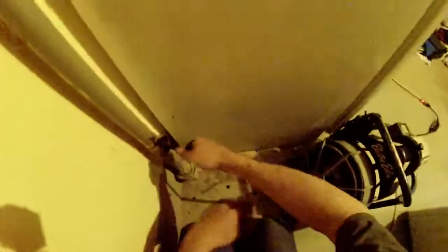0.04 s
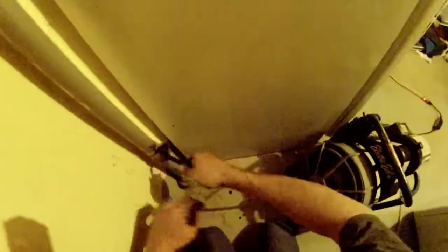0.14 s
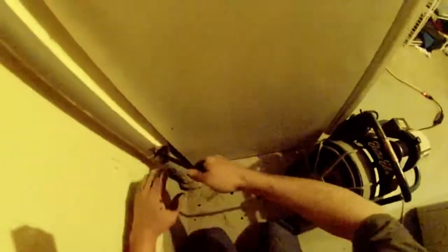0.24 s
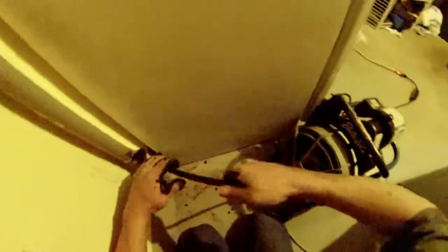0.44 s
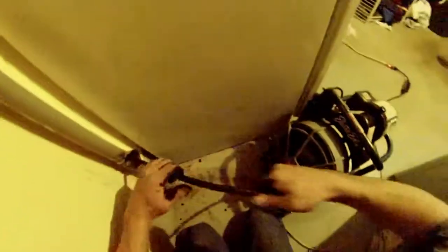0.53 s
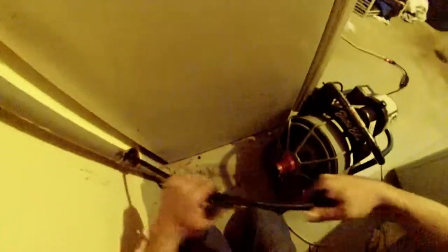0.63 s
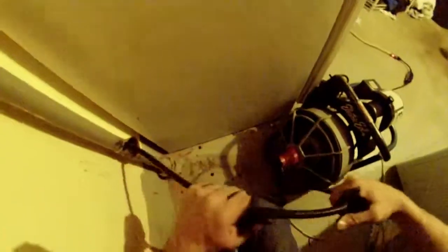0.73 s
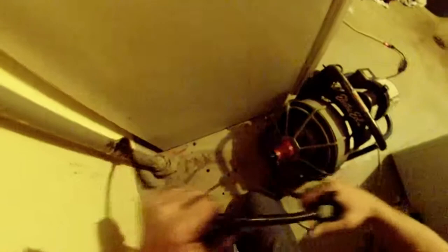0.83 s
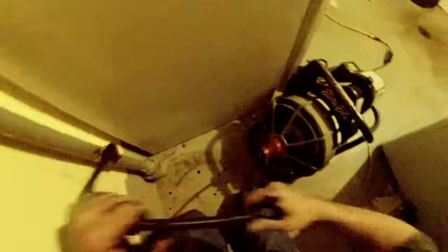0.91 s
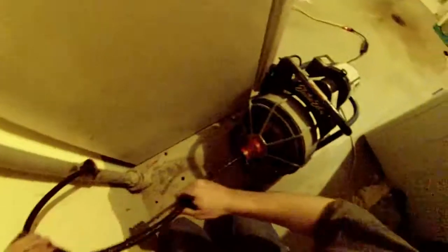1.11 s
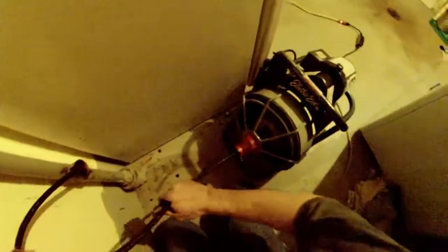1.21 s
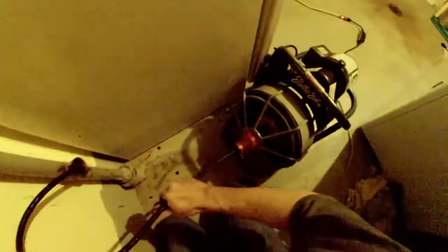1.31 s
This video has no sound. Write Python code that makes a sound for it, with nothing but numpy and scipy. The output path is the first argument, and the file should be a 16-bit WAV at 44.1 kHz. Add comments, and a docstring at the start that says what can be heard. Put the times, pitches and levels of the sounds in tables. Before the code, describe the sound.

One rattling scrape of a steel drain cable pulled from a pipe, then faint handling.

```python
"""A coiled steel drain cable, drawn out of a pipe in one stroke of the arm. Basement, close up, mono.
Its coils rattle over the rim, faster and then slower: a bright rasp over a low buzz, and the metal
rings on. The cable slides softly before the pull, rustles as it hangs slack, and scuffs as the hand
takes a new grip. Behind it are quick reflections from the corner, a short room tail and a low rumble."""
import sys
import numpy as np
from scipy import signal
from scipy.io import wavfile

SR = 44100
rng = np.random.default_rng(int(sys.argv[2]) if len(sys.argv) > 2 else 0)


def wrap_up_sound(samples):
    """Save the sound to the file named by the first command line argument, as 16-bit audio."""
    columns = np.atleast_2d(samples).T
    # keep every value between -1 and 1, then stretch to whole-number steps
    tamed = np.clip(columns, -1, 1)
    steps = np.round(tamed * 32767).astype(np.int16)
    wavfile.write(sys.argv[1], SR, steps)


N = 59535
T = np.arange(N) / SR

# coils passing over the rim: t/s, rate/Hz
COIL_RATE = [(.19, 114), (.24, 140), (.30, 181), (.345, 197), (.38, 210), (.405, 211), (.425, 221),
             (.46, 218), (.48, 221), (.505, 229), (.555, 226), (.58, 228), (.60, 219), (.625, 214),
             (.66, 221), (.685, 214), (.71, 195), (.76, 136), (.86, 80)]
# strength of the scraping and of the buzz: t/s, level/dB
SCRAPE_LEVEL = [(.192, -51.5), (.218, -36.5), (.265, -34.5), (.305, -28), (.35, -29.5), (.43, -29.3),
                (.47, -32.5), (.53, -30), (.62, -32.3), (.685, -30.3), (.735, -34.3), (.785, -35),
                (.82, -45.5), (.865, -80)]
BUZZ_LEVEL = [(.2, -51), (.255, -49), (.32, -52), (.39, -62), (.45, -44.5), (.51, -58.5), (.59, -44),
              (.70, -62.5), (.80, -43.5), (.86, -81.5)]
# spectra of the rasp, the buzz and the uneven chatter of the coils: f/Hz, relative level/dB
RASP_COLOUR = [(60, -40), (130, -6.5), (280, -20.5), (400, -2), (520, -2), (600, -6), (850, 1.5), (1030, 2),
               (1400, -4), (1800, 0.5), (2300, 0), (3200, 7.5), (4000, 4), (4900, 7), (5900, -1.5),
               (6700, 4), (7550, -1), (8400, -1), (9250, 2.5), (10700, -1.5), (12400, -0.5), (13300, -2.5),
               (15500, -7.5)]
BUZZ_COLOUR = [(60, -39), (110, -24), (145, 11.5), (220, 8.5), (290, -3.5), (390, -3), (480, -15.5),
               (660, -1), (900, -10), (1150, -14), (1500, 9), (2200, -34), (5000, -38.5)]
CHATTER_COLOUR = [(150, -30), (300, -13), (400, -2), (460, 0), (560, -12), (1000, -35)]
# damped resonances of the pipe, bright ones of the coils: f/Hz, width/Hz, relative level/dB
PIPE_MODES = [(375, 30, -14), (515, 25, -14), (657, 16, -8), (772, 17, -6), (921, 30, -13), (1130, 25, -11),
              (1205, 22, -3), (1380, 35, -1), (1450, 25, -3), (1570, 35, -3), (1982, 20, -1),
              (2400, 16, -1), (2522, 22, 0), (2690, 30, -3), (2965, 22, 0), (3070, 28, -3), (3460, 30, -1),
              (3970, 30, -2), (4263, 16, -1), (4421, 20, -3), (4528, 40, 0)]
COIL_MODES = [(4835, 50, 4), (4985, 30, 2), (5610, 45, 1), (6340, 50, -3), (6533, 25, 2), (6716, 35, -1),
              (6893, 25, -1), (7910, 40, -3), (8745, 35, 5), (8930, 30, 3), (9290, 50, -1), (9540, 45, 0),
              (9740, 45, 0), (10360, 30, 2), (11100, 45, -3), (11500, 40, -2), (11710, 35, 0),
              (11905, 55, 0), (12390, 55, -1), (12597, 35, -1)]
# flare-ups as the cable bears on the rim and feeds one resonance: t/s, half length/s, f/Hz, boost/dB
FLARES = [(.285, .02, 1415, 7), (.31, .015, 515, 9), (.32, .02, 921, 8), (.325, .025, 772, 6),
          (.345, .025, 1415, 4), (.35, .06, 1205, 4), (.405, .03, 2522, 7), (.425, .025, 1570, 4),
          (.465, .025, 1982, 3), (.515, .025, 1380, 5), (.55, .035, 1130, 7), (.555, .018, 1570, 7),
          (.565, .02, 2965, 4), (.625, .018, 1450, 6), (.65, .035, 2400, 6), (.68, .02, 1570, 6),
          (.715, .02, 1205, 6), (.745, .035, 772, 8)]
# long ringing of the metal: f/Hz, relative level/dB, t60/s
RING_MODES = [(1204, -4, .2), (1389, -6, 1.1), (1427, -7, .8), (1545, -11, 1.0), (1620, -10, .73),
              (1857, -5, .62), (2135, 2.5, .6), (3950, -5, .48), (4500, -1, .45), (4597, -9, .62),
              (4807, -7, .48), (5044, -8, .5), (5443, -6, .45), (5884, -3, .4), (6212, -9, .42),
              (6535, -5, .25), (6713, -4, .33), (6895, -5, .25)]

# soft sliding and light ticks on the rim as the pull begins: t/s, level/dB
SLIDE_LEVEL = [(.055, -81), (.066, -61.5), (.12, -66.5), (.13, -54.5), (.19, -54.5), (.3, -82)]
RIM_TICKS = [(.104, -51), (.128, -53), (.202, -41), (.215, -38)]
# resonances that a light touch wakes: f/Hz, width/Hz, relative level/dB
TOUCH_MODES = [(1390, 14, -2), (2400, 46, -2), (4550, 40, 0), (6520, 35, -1), (7760, 79, -7),
               (8950, 37, -2), (9720, 100, -6)]
# rustle and ticks of the slack cable in the hand: t/s, level/dB
RUSTLE_LEVEL = [(.86, -73), (.95, -67), (.96, -55), (.985, -60.5), (1.03, -69.5), (1.10, -70.5),
                (1.18, -86.5), (1.26, -69.5), (1.31, -70), (1.35, -58)]
HAND_TICKS = [(.957, -58), (1.005, -59), (1.094, -65), (1.234, -66), (1.267, -64)]
# low rubbing in pipe and hands, dull knocks of the new grip: t/s, level/dB
RUB_LEVEL = [(.05, -81), (.09, -62), (.17, -56), (.24, -57), (.315, -51), (.42, -59), (.64, -63),
             (.73, -46), (.80, -51), (.87, -59), (.94, -70), (1.05, -85)]
GRIP_KNOCKS = [(1.289, -55), (1.297, -55), (1.308, -57), (1.317, -59), (1.325, -53), (1.333, -55),
               (1.342, -46)]
# spectra of the sliding, the rustle, the rubbing and the grip: f/Hz, relative level/dB
SLIDE_COLOUR = [(100, -16), (400, -7), (900, -1.5), (1400, 7.5), (2200, -5), (3200, 0.5), (4500, -3.5),
                (5700, -9), (7000, -2.5), (9500, -5.5), (12000, -4.5), (15500, -19)]
RUSTLE_COLOUR = [(100, -18), (400, -2), (1400, -2), (2200, -5), (3200, -1.5), (4500, 0), (7000, -1.5),
                 (9500, -2), (12000, -1), (15500, -13)]
RUB_COLOUR = [(40, -35), (100, -12), (165, 5.5), (210, 2.5), (280, -5), (380, 1.5), (470, -7), (620, -8),
              (780, -6), (1000, -17), (2000, -11), (6000, -33)]
GRIP_COLOUR = [(100, -11), (400, -16), (580, 5), (850, 2.5), (1300, -15), (3000, -16.5), (6000, -19),
               (15000, -33)]
# soft low swell as the arm stops: t/s, half length/s, f/Hz, level/dB
ARM_THUD = (.91, .05, 62, -62)

# decay of the basement: f/Hz, t60/s
BASEMENT_DECAY = [(100, 0.65), (400, 0.11), (1000, 0.32), (3000, 0.27), (6000, 0.27), (14000, 0.095)]
# spectrum of its room tone: f/Hz, relative level/dB
ROOM_TONE_COLOUR = [(20, -11), (45, 0), (62, 5.5), (90, -3), (200, -6.5), (300, -16), (700, -21.5),
                    (1500, -22), (4000, -30), (10000, -49.5), (15500, -46.5)]

JITTER_S, CRUNCH_S, TICK_S, KNOCK_S = .00003, .00055, .004, .008
ALIKE_HZ = 2800  # below this every coil sounds much alike
RASP_DB, PIPE_DB, COILS_DB, CHATTER_DB, RING_DB = -10, -7.5, -9.5, -31, -17.5
CORNER_DB, TAIL_DB, ROOM_TONE_DB = 6.5, -10, -72.5


def cable_pull(roughness=.4, grit_db=-4.5):
    """Close on the rim: each coil gives a firm blow low down and a crunch above, exciting the metal."""
    hits = coil_hits()
    scrape_db = curve(SCRAPE_LEVEL, left=-140, right=-140)
    crunch = through(hits, np.exp(-T[:2000] / CRUNCH_S)) * rng.standard_normal(N)
    friction = crunch / crunch.std() + amp(grit_db) * grit()
    blows = np.sqrt(1 - roughness ** 2) * hits + roughness * friction
    low, high = (signal.butter(1, ALIKE_HZ, kind, fs=SR) for kind in ("low", "high"))
    scrape = (signal.lfilter(*low, blows) + signal.lfilter(*high, friction)) * amp(scrape_db)
    rasp = amp(RASP_DB) * through(scrape, colour(RASP_COLOUR))
    pipe = amp(PIPE_DB) * resonances(scrape, PIPE_MODES)
    coils = amp(COILS_DB) * resonances(scrape, COIL_MODES)
    buzz = through(hits * amp(curve(BUZZ_LEVEL, left=-140)), colour(BUZZ_COLOUR))
    uneven_hits = hits * rng.standard_normal(N)
    chatter = through(uneven_hits * amp(scrape_db + CHATTER_DB), colour(CHATTER_COLOUR))
    return rasp + amp(CORNER_DB) * corner_reflections(rasp) + pipe + coils + buzz + chatter


def coil_hits():
    """One blow as each coil drops over the rim, a little uneven in time."""
    passed = np.cumsum(curve(COIL_RATE)) / SR
    count = int(passed[-1])
    jitter = JITTER_S * rng.standard_normal((400, 2))[:count, 0]
    times = np.interp(np.arange(count) + 1, passed, T) + jitter
    hits = np.zeros(N)
    hits[np.clip((times * SR).astype(int), 0, N - 1)] = 1
    return hits / hits.std()


def resonances(scrape, table, swell_db=3, swell_s=.09, reach_hz=45):
    """As the contact shifts, each resonance is fed by turns more and less; some flare up briefly."""
    out = np.zeros(N)
    for (hz, _, _), mode in zip(table, modes(table)):
        swell = through(rng.standard_normal(N), unit(np.hanning(int(swell_s * SR))))
        flare_db = sum(db * bell(at, half) for at, half, flare_hz, db in FLARES
                       if abs(flare_hz - hz) < reach_hz)
        out += through(scrape * amp(swell_db * np.tanh(swell) + flare_db), mode)
    return out


def metal_ring(start_db=-68, waver_depth=.1):
    """The long modes of the metal, faintly ringing already, store the scraping and let it go slowly."""
    power = amp(curve(SCRAPE_LEVEL, left=-140, right=-140)) ** 2
    out = np.zeros(N)
    for hz, db, t60 in RING_MODES:
        retained = amp(-120 / (t60 * SR))  # share of the energy left after one sample
        stored = signal.lfilter([1 - retained], [1, -retained], power, zi=[amp(start_db) ** 2])[0]
        waver = through(rng.standard_normal(N) + 1j * rng.standard_normal(N), unit(np.hanning(3000)))
        tone = ((1 + waver_depth * waver) * np.exp(2j * np.pi * hz * T)).real
        out += amp(db) * np.sqrt(stored) * tone
    return out


def sliding(slide_db=-5.5, metal_db=-7):
    """The cable creeps and ticks over the rim before the pull, and the metal rings faintly."""
    touch = grit() * amp(curve(SLIDE_LEVEL, right=-140)) + bursts(RIM_TICKS, TICK_S)
    metal = amp(metal_db) * through(touch, modes(TOUCH_MODES).sum(0))
    return amp(slide_db) * through(touch, colour(SLIDE_COLOUR)) + metal


def rustling(rustle_db=-3.5, metal_db=-16.5):
    """The slack cable slips through the hand: a soft, high rustle that barely stirs the pipe."""
    touch = grit() * amp(curve(RUSTLE_LEVEL, left=-140)) + bursts(HAND_TICKS, TICK_S)
    metal = amp(metal_db) * through(touch, modes(TOUCH_MODES).sum(0))
    return amp(rustle_db) * through(touch, colour(RUSTLE_COLOUR)) + metal


def handling():
    """Close by, the cable rubs as it shifts, the arm stops with a soft thud, the hand grips anew."""
    at, half, hz, db = ARM_THUD
    thud = amp(db) * bell(at, half) * np.sin(2 * np.pi * hz * T)
    rub = through(rng.standard_normal(N) * amp(curve(RUB_LEVEL)), colour(RUB_COLOUR))
    grip = through(bursts(GRIP_KNOCKS, KNOCK_S), colour(GRIP_COLOUR))
    return rub + thud + grip


def corner_reflections(x, decay_s=.007):
    """The walls around the pipe: sparse echoes reach the microphone from 2 ms after the direct sound."""
    t = T[:4000]
    echoes = rng.standard_normal(len(t)) * (rng.random(len(t)) < .05) * (t > .002)
    return through(x, unit(echoes * np.exp(-t / decay_s)))


def basement_tail(x):
    """Farther off, the basement's diffuse tail, each band dying at its own speed."""
    hz, t, noise = signal.stft(rng.standard_normal(SR), SR, nperseg=256)
    decay = amp(-60 * t / at_frequency(BASEMENT_DECAY, hz)[:, None])
    tail = signal.istft(noise * decay, SR, nperseg=256)[1]
    return through(x, unit(tail))


def room_tone():
    """A steady, quiet rumble behind everything."""
    return through(rng.standard_normal(N), colour(ROOM_TONE_COLOUR))


def grit(spread_db=2):
    """Dense friction grains of uneven size, 16 samples each."""
    noise = rng.standard_normal(N)
    sizes = np.repeat(np.minimum(rng.exponential(1, N), 4), 16)[:N]
    grains = noise * amp(spread_db * sizes)
    return grains / grains.std()


def bursts(table, decay_s):
    """Short puffs of noise, one for each row."""
    level = sum(amp(db) * (T >= at) * np.exp(-abs(T - at) / decay_s) for at, db in table)
    return level * rng.standard_normal(N)


def modes(table):
    """Decaying sines, of energy one together; neighbours swing in opposite directions."""
    t = T[:SR // 3]
    sines = [(-1) ** k * amp(db) * width * np.exp(-np.pi * width * t) * np.sin(2 * np.pi * hz * t)
             for k, (hz, width, db) in enumerate(table)]
    return unit(np.array(sines))


def colour(points, size=4096):
    """Causal response with the given spectral shape."""
    log_gain = np.log(amp(at_frequency(points, abs(np.fft.fftfreq(size, 1 / SR)))))
    spectrum = np.exp(np.conj(signal.hilbert(log_gain)))
    return unit(np.fft.ifft(spectrum).real)


def at_frequency(points, hz):
    """Reads a table on a log-frequency axis."""
    f, value = np.transpose(points)
    return np.interp(np.log(hz + 1), np.log(f), value)


def curve(points, **ends):
    """A control curve at every sample."""
    return np.interp(T, *np.transpose(points), **ends)


def bell(at_s, half_s):
    """A smooth rise and fall."""
    return np.exp(-((T - at_s) / half_s) ** 2)


def through(x, response):
    """Plays a sound through a response."""
    return signal.fftconvolve(x, response)[:N]


def unit(x):
    """Scales a response to an energy of one."""
    return x / np.sqrt(np.sum(x ** 2) + 1e-20)


def amp(db):
    """Decibels to gain."""
    return 10 ** (np.asarray(db) / 20)


def scene():
    """At the microphone: cable and hand up close, the metal ringing on, the basement behind."""
    near = cable_pull() + sliding() + rustling() + handling()
    ring = amp(RING_DB) * metal_ring()
    background = amp(ROOM_TONE_DB) * room_tone() + amp(TAIL_DB) * basement_tail(near)
    return (near + ring + background)[None]


def record(dry, edge_hz=15500):
    """The recorder's band limit."""
    lowpass = signal.firwin(511, edge_hz, window=("kaiser", 9), fs=SR)
    return signal.oaconvolve(dry, lowpass[None], "same")


dry = scene()
out = record(dry)
wrap_up_sound(out)
```